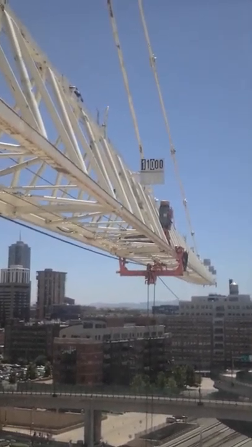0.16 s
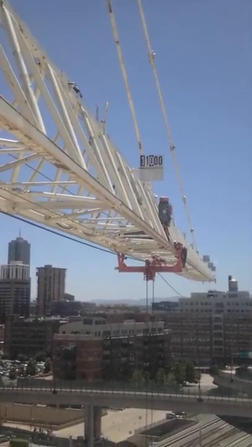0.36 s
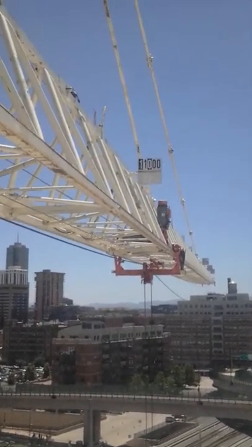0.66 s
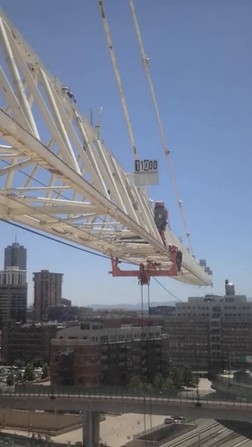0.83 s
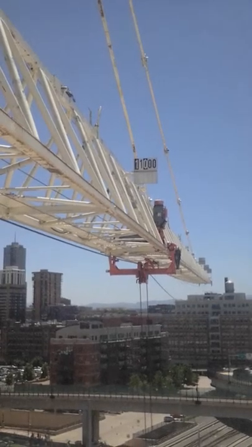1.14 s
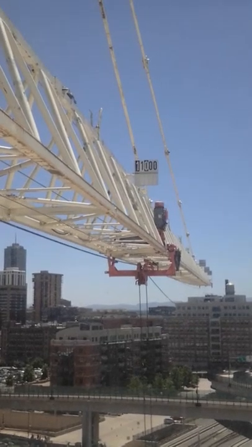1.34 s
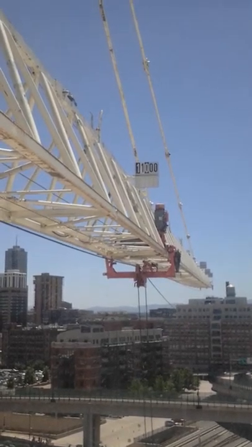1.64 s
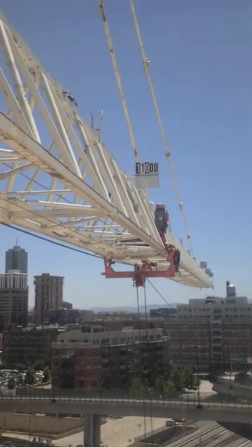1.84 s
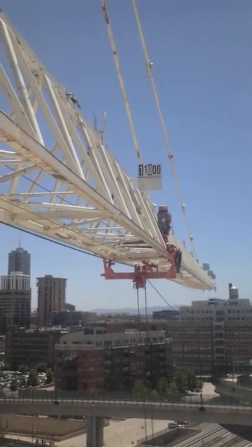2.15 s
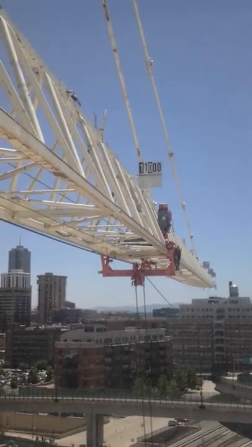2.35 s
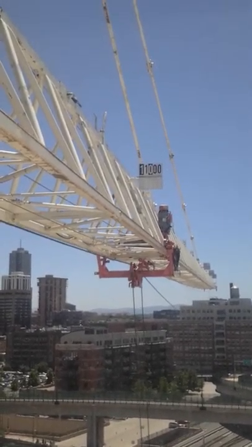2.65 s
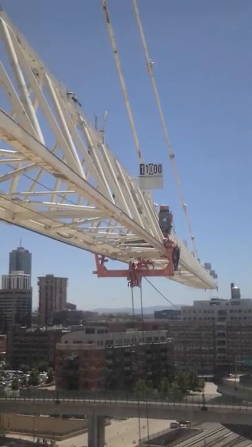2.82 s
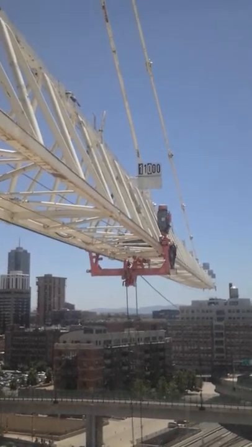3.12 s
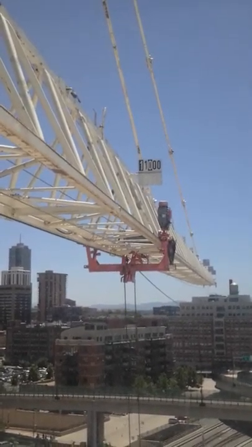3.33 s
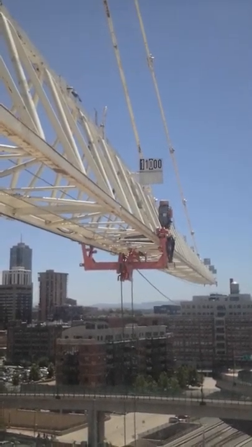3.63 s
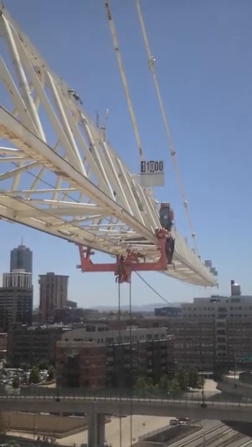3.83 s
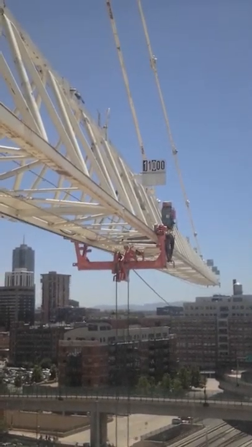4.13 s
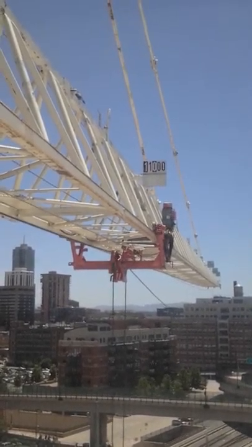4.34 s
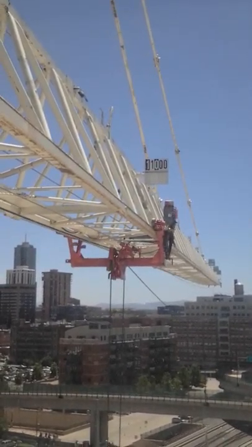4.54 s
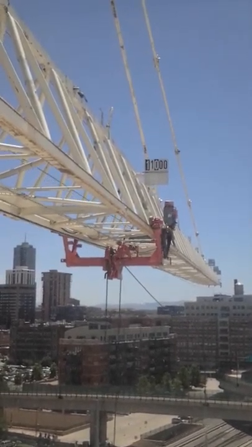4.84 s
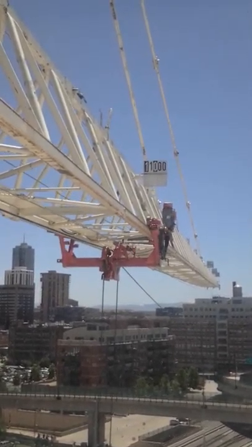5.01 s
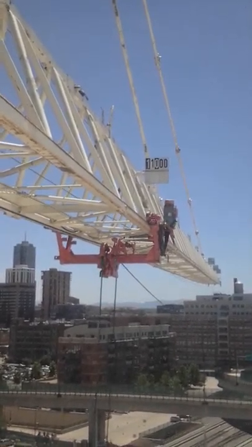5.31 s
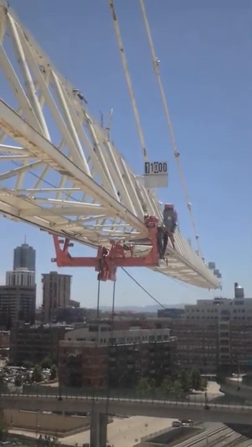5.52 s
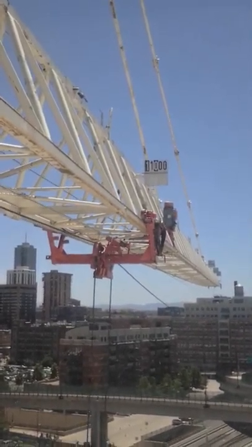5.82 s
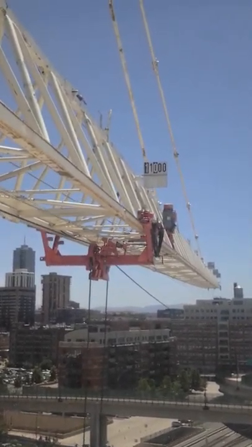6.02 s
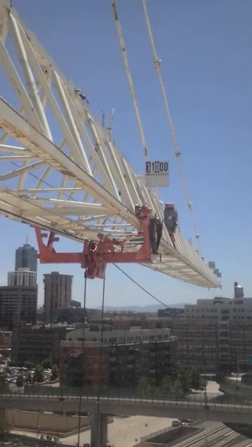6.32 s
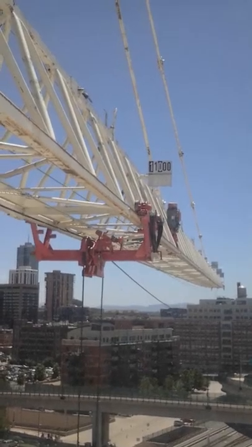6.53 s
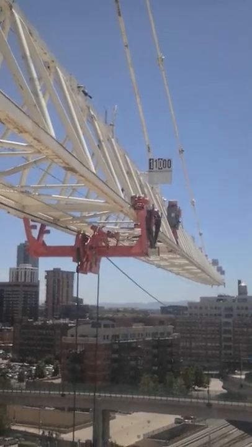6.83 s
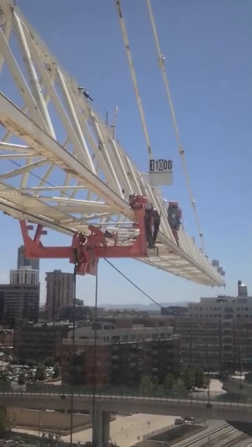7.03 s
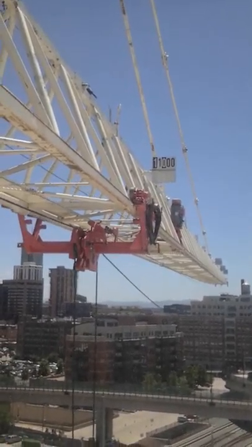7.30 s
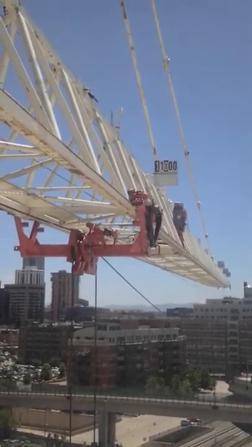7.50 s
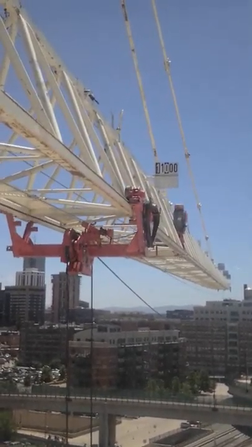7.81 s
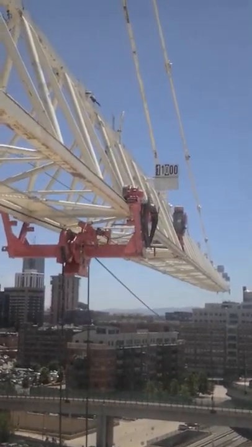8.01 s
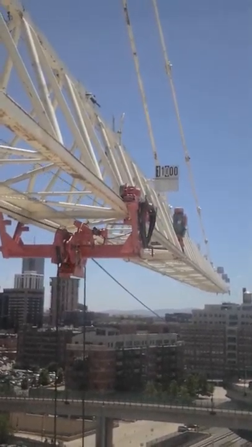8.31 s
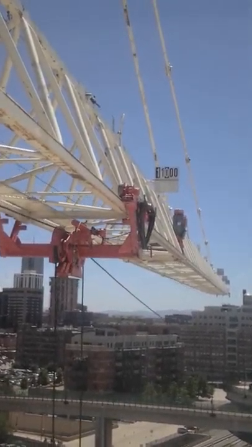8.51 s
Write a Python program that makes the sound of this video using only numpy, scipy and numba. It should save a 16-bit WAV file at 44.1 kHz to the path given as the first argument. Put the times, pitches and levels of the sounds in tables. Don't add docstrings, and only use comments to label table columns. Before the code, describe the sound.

Inside a crane cab, a steady low motor hum with faint fan hiss, swelling trolley rumble, and sharp gritty snaps close by.

```python
import sys
import numpy as np
from scipy import signal
from scipy.fft import rfft, irfft
from scipy.io import wavfile
from scipy.ndimage import uniform_filter1d
from numba import njit

SR = 44100
rng = np.random.default_rng(int(sys.argv[2]) if len(sys.argv) > 2 else 0)


def wrap_up_sound(samples):
    columns = np.atleast_2d(samples).T
    tamed = np.clip(columns, -1, 1)
    steps = np.round(tamed * 32767).astype(np.int16)
    wavfile.write(sys.argv[1], SR, steps)


def attenuation_scalar(level_db):
    decades = np.asarray(level_db, float) / 20
    return 10 ** decades


N = 381906

# pitch_hz, level_db, waver_db, wander_hz
MOTOR_TONES = [
    (85.37, -22, 2, 1.092),
    (58.8, -36.5, 3, 0.52),
    (172, -45.5, 0, 0.63),
    (3018, -61, 1.5, 14),
]
# time_s, load_db
TROLLEY_LOAD = [(0, -26.5), (1.2, -26), (1.85, -26.5), (2.3, -20.5), (2.65, -24), (3.1, -20.5),
                (3.5, -20.5), (3.7, -18.5), (4.2, -17.5), (4.85, -17), (5.0, -25.5), (5.7, -24.5),
                (6.1, -19), (6.8, -19), (7.2, -22), (7.6, -24.5), (7.95, -22.5), (8.66, -26)]
# start_s, wheel_jolt_db, jib_jolt_db
RAIL_JOINTS = [(1.969, 4, 10.5), (2.269, -5, 4), (2.5, -4, 2.5), (2.71, 8.5, 9), (2.83, 3.5, 2),
               (4.1, 3, 0), (4.66, 2.5, -4), (4.9, -5, 9), (6.03, -3, -0.5), (6.37, -3, 0), (6.61, 3, -1.5),
               (6.83, -4.5, 1), (7.08, -7, 1.5), (7.68, 7, 3.5), (7.85, 1, 1), (8.22, 0, 1), (8.63, 9, 5)]
# centre_hz, width_hz, level_db
BOOM_MODES = [(69, 19.5, -12), (83, 7.2, -6.5), (101.3, 12.1, -5.5), (112.7, 9, -2), (122.25, 8.9, 1.5),
              (136.3, 5.9, -7)]
DRONE_MODES = [(150, 9.5, -3), (166.3, 8.8, 0), (180.9, 10.4, -0.5), (199, 13.6, -6.5), (224.7, 11, -8.5)]
RING_MODES = [(281.6, 15, -1), (311.2, 28, -3.5), (356.5, 58, -2), (450.5, 49, -3.5), (569, 50, -8.5),
              (596, 14.5, -7.5), (645, 21, -6), (716, 36, -13)]
RAIL_MODES = [(885.5, 46, 3), (980.6, 30, 6), (1079, 78, 0), (1207, 59, -1), (1630, 540, -17),
              (1780, 80, -13.5), (2190, 450, -12)]
# centre_hz, width_hz, level_db
PANEL_MODES = [(309.4, 9.8, -1.5), (454.4, 12.7, 3.5)]
# freq_hz, density_db_per_hz
FAN_COLOUR = [(25, -48.5), (45, -9), (200, -5), (270, -14), (800, -18), (1470, -20), (3000, -25.5),
              (5850, -27.5), (8000, -35), (10500, -44), (13000, -53.5), (15000, -49.5)]
# start_s, length_s, level_db
SLIDE_STROKES = [(0.01, 0.26, -47.5), (0.29, 0.25, -45), (0.596, 0.16, -42), (0.806, 0.13, -44.5),
                 (0.938, 0.11, -45.5), (4.242, 0.11, -51), (4.53, .03, -55), (4.96, 0.1, -52.5),
                 (5.118, 0.084, -55), (5.48, 0.043, -50), (7.19, 0.15, -49), (7.33, 0.16, -44.5),
                 (7.604, 0.12, -45.5), (7.806, 0.049, -51), (8.222, 0.08, -51), (8.3, 0.074, -45.5),
                 (8.368, 0.081, -43.5), (8.492, 0.15, -44)]
# centre_hz, width_hz, level_db
SLIDE_MODES = [(5420, 190, 15), (5900, 6500, 7), (9060, 460, -20), (10300, 230, 7), (11700, 330, 2.5),
               (13900, 750, -13)]
# time_s, scrape_db, squeak_db
LAST_SCRAPE = [
    (8.52, -69, -53),
    (8.54, -43, -61),
    (8.596, -37.5, -44.5),
    (8.622, -27.5, -30.5),
    (8.64, -36, -34),
    (8.66, -42, -45),
]
# centre_hz, width_hz, level_db
SCRAPE_MODES = [(7260, 910, -6.5), (8430, 690, -2.5), (10000, 900, -10), (11900, 1500, -11.5),
                (13700, 1400, -10)]
SQUEAK_MODES = [(4760, 220, 2), (4200, 280, -4), (2700, 280, -9), (1300, 500, -11)]
# start_s, peak_db, centre_hz, shell_db
SNAP_EVENTS = [(0.501, -28, 5900, -1), (0.53, -14, 6240, -2), (0.5374, -14, 5960, 1),
               (0.5396, -13.5, 5900, -1), (0.548, -28, 6000, -2), (0.556, -7, 5800, -3.5),
               (0.5572, -14.5, 6300, -11), (0.565, -24, 6000, -5), (0.6148, -22, 5800, -7),
               (4.727, -9, 5900, -2), (4.7413, -14.5, 6000, -3), (4.753, -23.5, 5840, -16),
               (5.193, -34, 6350, -12), (5.239, -12, 6290, -3.5), (5.2523, -9.5, 5960, -6),
               (5.28, -22.5, 4480, 5.5), (6.696, -10, 6100, -0.5), (6.706, -13, 5700, -5),
               (7.2257, -34, 5630, -3), (7.281, -13, 6250, -3.5), (7.2968, -11.5, 6060, -5),
               (7.331, -27, 4400, -1), (7.737, -8.5, 6130, -1.5), (7.7481, -17, 5740, -11),
               (8.1317, -12.5, 6200, -0.5), (8.143, -14, 5430, -12), (8.21, -25.5, 3570, -17),
               (8.3512, -36.5, 5450, 9.5), (8.4628, -12, 5930, -0.5), (8.4733, -21, 5400, -10)]
# centre_hz, width_hz, level_db
SHELL_MODES = [(3216, 280, -13), (4370, 2200, -7.5), (7560, 1200, -4), (8630, 1140, -6.5), (11350, 550, -8),
               (12500, 1700, -18), (1500, 840, -13)]
# start_s, length_s, level_db, centre_hz, width_hz
PANEL_BURSTS = [(0.556, 0.015, -29.5, 590, 1200), (0.557, 0.019, -34, 2700, 1300),
                (0.56, .015, -37, 1000, 700), (2.73, 0.058, -37, 1130, 160), (2.745, 0.06, -45, 1560, 400),
                (2.74, 0.085, -41, 590, 67), (2.87, 0.079, -34.5, 450, 30), (7.7, 0.014, -36, 3080, 150),
                (7.3, 0.023, -42, 3100, 220), (8.21, 0.024, -43, 1030, 170),
                (4.658, 0.023, -42.5, 1800, 900), (4.864, 0.029, -47.5, 2500, 1800),
                (5.19, .012, -43, 6300, 250), (5.27, 0.022, -37.5, 2400, 1300),
                (7.734, 0.034, -43, 1000, 1000), (1.949, 0.058, -44, 910, 410),
                (1.849, 0.14, -34, 210, 105), (2.054, 0.072, -33.5, 302, 25), (2.76, 0.15, -29, 180, 26),
                (6.82, .1, -21.5, 108, 26)]
# start_s, peak_db, pitch_hz, t60_s
FRAME_KNOCKS = [
    (0.568, -5, 112, 0.13),
    (0.56, -32, 880, 0.035),
    (7.70, -27, 660, 0.14),
    (2.75, -31, 640, 0.5),
    (3.5, -33, 1150, .2),
]


def level(x, rms_db):
    return x * attenuation_scalar(rms_db) / np.sqrt(np.mean(x ** 2))


def noise():
    return rng.standard_normal(N)


def curve(table, outside_db=None):
    time_s, *columns = np.transpose(table)
    return [np.interp(np.arange(N) / SR, time_s, c, outside_db, outside_db) for c in columns]


@njit
def svf(x, hz, width_hz):
    y, band, low = np.empty(len(x)), 0., 0.
    g, k = np.tan(np.pi * hz / SR), width_hz / hz
    for i in range(len(x)):
        v = (band + g * (x[i] - low)) / (1 + g * (g + k))
        band, low, y[i] = 2 * v - band, low + 2 * g * v, k * v
    return y


def steep(x, hz, width_hz):
    hz, wide_hz = 1. * hz, 1.85 * width_hz
    return svf(svf(x, hz, wide_hz), hz, wide_hz)


def walk(rate_hz):
    k = int(SR / rate_hz)
    held = np.repeat(rng.standard_normal(N // k + 1), k)
    return 1.1 * uniform_filter1d(uniform_filter1d(held, k), k)[:N]


def body(modes, flicker_db, rate_hz):
    total = np.zeros(N)
    for hz, width_hz, db in modes:
        total += attenuation_scalar(db + flicker_db * walk(rate_hz)) * steep(noise(), hz, width_hz)
    return level(total, 0)


def motor():
    out = np.zeros(N)
    for hz, db, waver_db, wander_hz in MOTOR_TONES:
        gain = np.sqrt(2) * attenuation_scalar(db + waver_db * walk(4.367))
        turns = np.cumsum(hz + wander_hz * walk(4)) / SR + rng.random()
        out += gain * np.sin(2 * np.pi * turns)
    return out


def jolts(column, lag_s):
    rise_s, fall_s = 0.011, 0.1
    joints = np.array(RAIL_JOINTS)
    t = np.maximum(np.arange(N) / SR - joints[:, :1] - lag_s, 0)
    kick = 1.27 * (1 - np.exp(-t / rise_s)) * np.exp(-t / fall_s)
    return joints[:, column] @ kick


def trolley():
    rest_load_db = -24
    load_db = curve(TROLLEY_LOAD)[0] - rest_load_db
    wheels_db = jolts(1, lag_s=0)
    jib_db = jolts(2, lag_s=0.05)

    def shake(jolt_db, rest_db, per_load, per_jolt):
        return attenuation_scalar(rest_db + per_load * load_db + per_jolt * jolt_db)

    boom = shake(jib_db, -23.5, 0.89, 1.2) * body(BOOM_MODES, flicker_db=1.5, rate_hz=3.17)
    drone = shake(jib_db, -33, 0.7, 0.87) * body(DRONE_MODES, flicker_db=1.6, rate_hz=2.94)
    ring = shake(wheels_db, -38.5, 0.51, 0.56) * body(RING_MODES, flicker_db=0.5, rate_hz=3.8)
    panel = shake(jib_db, -44.5, 1.23, 0.38) * body(PANEL_MODES, flicker_db=4.0, rate_hz=4.5)
    rail = shake(wheels_db, -46, 0.35, 0.92) * body(RAIL_MODES, flicker_db=3.0, rate_hz=5.4)
    return boom + drone + ring + panel + rail


def fan():
    hz, db = np.transpose(FAN_COLOUR)
    bins_hz = np.arange(N // 2 + 1) * SR / N + 1
    colour = attenuation_scalar(np.interp(np.log(bins_hz), np.log(hz), db))
    return level(irfft(rfft(noise()) * colour, N), -38.5)


def strokes():
    swell_db, edge_s = -5, 0.021
    t, gain = np.arange(N) / SR, np.zeros(N)
    for start_s, length_s, db in SLIDE_STROKES:
        done = np.clip((t - start_s) / length_s, 0, 1)
        attack = np.clip((t - start_s) / edge_s, 0, 1)
        release = np.exp(-np.maximum(t - start_s - length_s, 0) / edge_s)
        gain += attenuation_scalar(db + swell_db * (2.5 - done)) * attack * release
    return gain


def rustle():
    scrape_db, squeak_db = curve(LAST_SCRAPE, outside_db=-120)
    slide = attenuation_scalar(10) * strokes() * body(SLIDE_MODES, flicker_db=3.0, rate_hz=17)
    scrape = attenuation_scalar(scrape_db + 1.0) * body(SCRAPE_MODES, flicker_db=4.0, rate_hz=60)
    squeak = attenuation_scalar(squeak_db + 2.5) * body(SQUEAK_MODES, flicker_db=3.0, rate_hz=60)
    return slide + scrape + squeak


def snaps():
    crack_t60_s, grit_t60_s, grit_db = 0.01, 0.12, -8.5
    out, size = np.zeros(N), SR // 4
    t = np.arange(size) / SR
    rise = (1 - np.exp(-t / 0.0011)) ** 2
    crack = rise * 1000 ** (-t / crack_t60_s)
    for start_s, peak_db, hz, shell_db in SNAP_EVENTS:
        hiss, chance = rng.standard_normal((2, size))
        patchy = attenuation_scalar(14.8 * uniform_filter1d(chance, size=40))
        grit = attenuation_scalar(grit_db) * patchy * rise * 1000 ** (-t / grit_t60_s)
        push = hiss * (crack + grit)
        shell = sum(attenuation_scalar(db) * steep(push, f, w) for f, w, db in SHELL_MODES)
        ring = steep(push, hz, 1540) + attenuation_scalar(shell_db) * shell
        at = int((start_s - 0.001) * SR)
        out[at:at + size] += (attenuation_scalar(peak_db + 9) * ring)[:N - at]
    return out


def shudders():
    out, size = np.zeros(N), SR // 2
    t = np.arange(size) / SR
    for start_s, length_s, db, hz, width_hz in PANEL_BURSTS:
        shape = 2.92 * t / (0.36 * length_s) * np.exp(-t / (0.44 * length_s))
        burst = shape * level(steep(rng.standard_normal(size), hz, width_hz), db)
        at = int(start_s * SR)
        out[at:at + size] += burst[:N - at]
    return out


def thumps():
    out = np.zeros(N)
    for start_s, peak_db, hz, t60_s in FRAME_KNOCKS:
        t = np.maximum(np.arange(N) / SR - start_s, 0)
        envelope = (1 - np.exp(-t / 0.0061)) * 1000 ** (-t / t60_s)
        out += attenuation_scalar(peak_db) * envelope * np.sin(2 * np.pi * hz * t)
    return out


def scene():
    mix = motor() + trolley() + fan() + rustle() + snaps() + shudders() + thumps()
    return mix[None]


def top_cut(x):
    return signal.sosfilt(signal.butter(12, 15450, fs=SR, output="sos"), x)


def record(dry):
    soft = np.tanh(1.274 * dry) / 1.2
    low_pass = signal.ellip(8, 0.2, 60, 14800, fs=SR, output="sos")
    return top_cut(signal.sosfilt(low_pass, soft))


dry = scene()
out = record(dry)
wrap_up_sound(out)
```